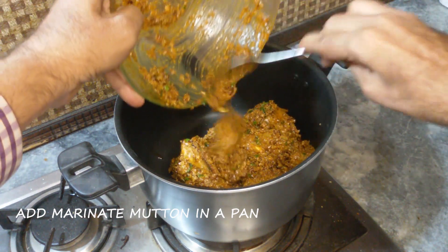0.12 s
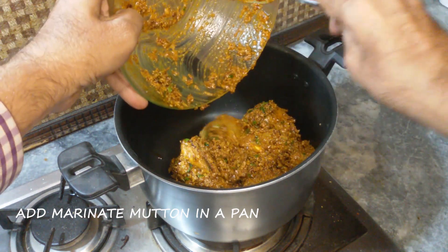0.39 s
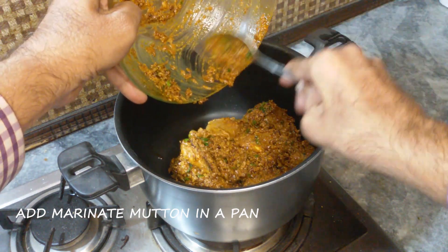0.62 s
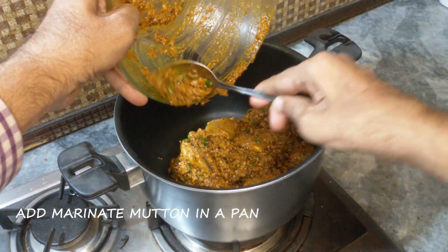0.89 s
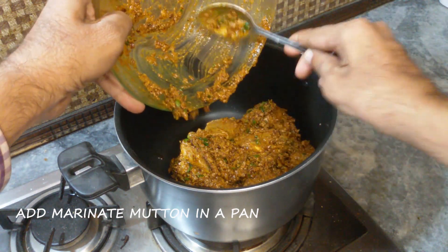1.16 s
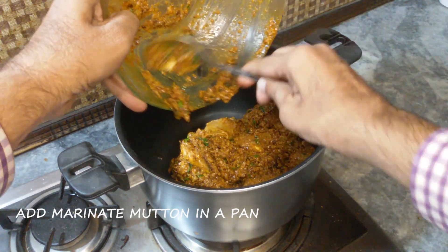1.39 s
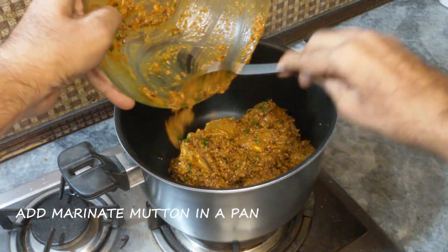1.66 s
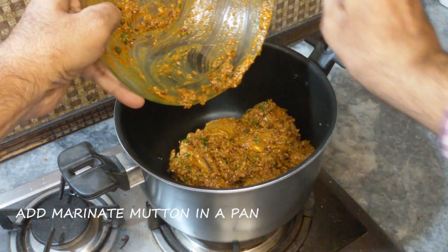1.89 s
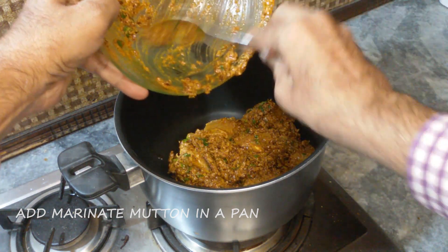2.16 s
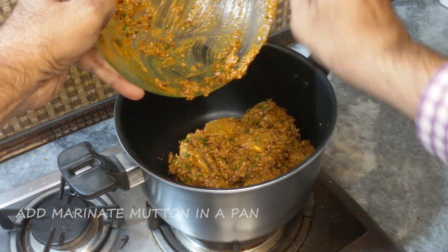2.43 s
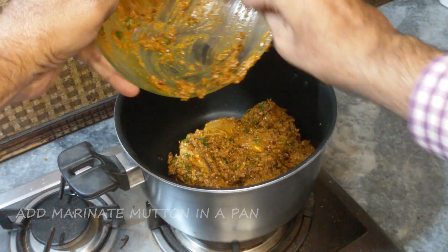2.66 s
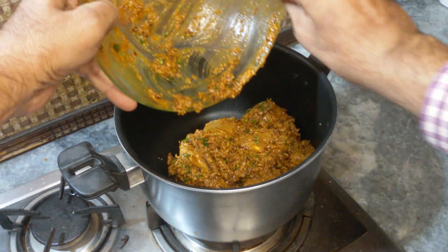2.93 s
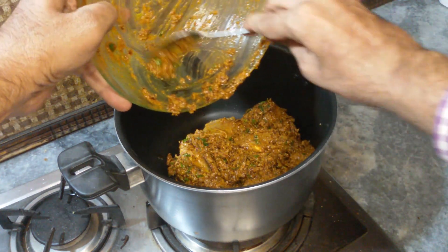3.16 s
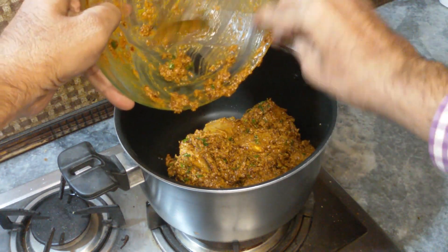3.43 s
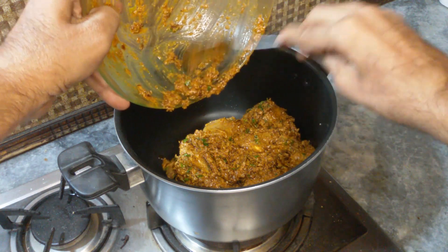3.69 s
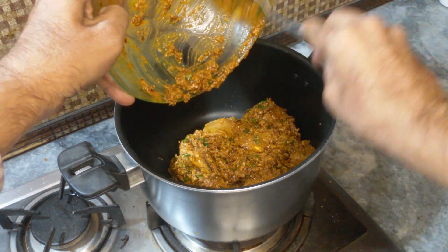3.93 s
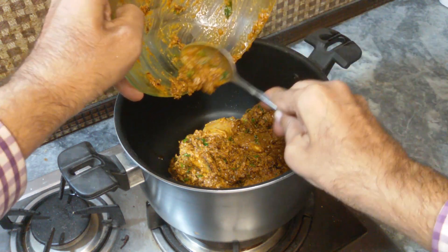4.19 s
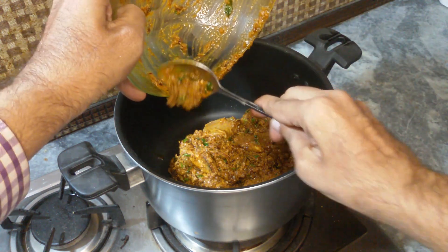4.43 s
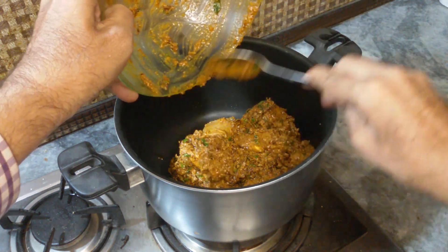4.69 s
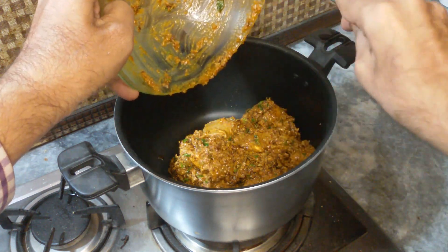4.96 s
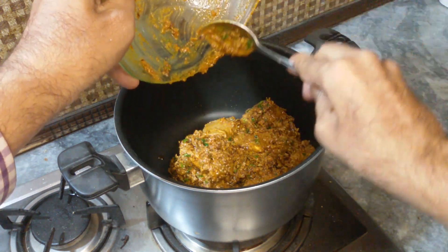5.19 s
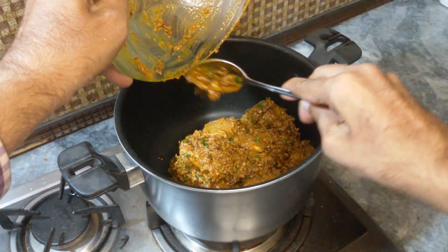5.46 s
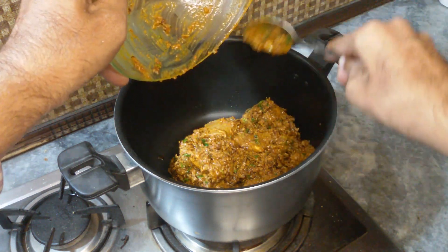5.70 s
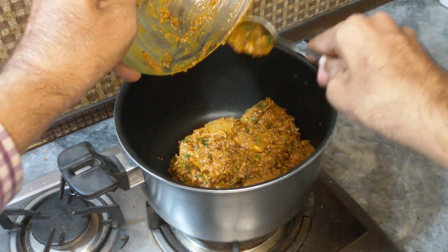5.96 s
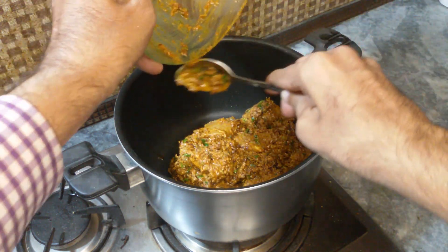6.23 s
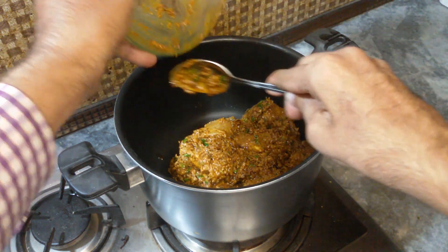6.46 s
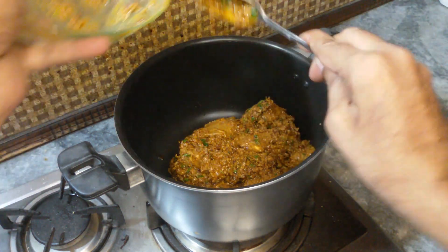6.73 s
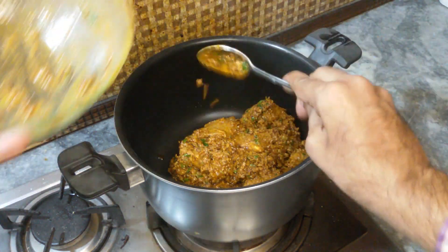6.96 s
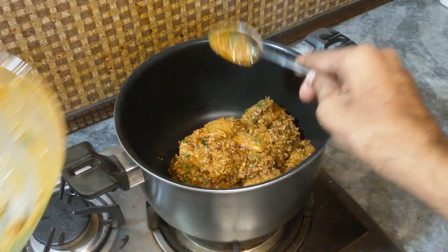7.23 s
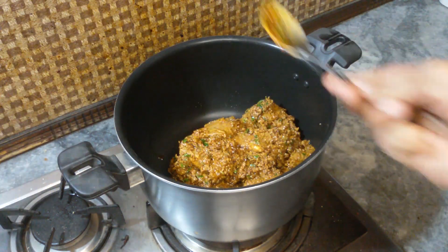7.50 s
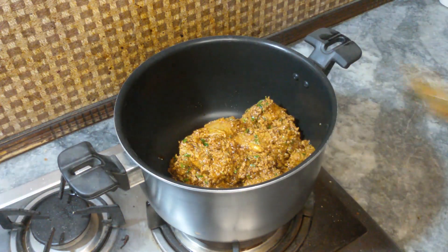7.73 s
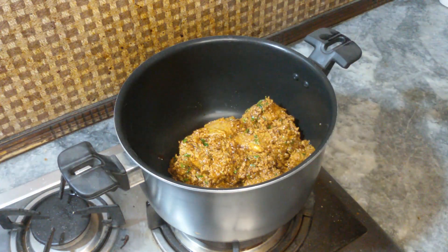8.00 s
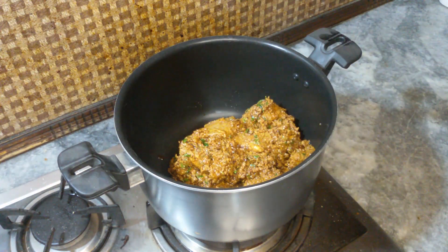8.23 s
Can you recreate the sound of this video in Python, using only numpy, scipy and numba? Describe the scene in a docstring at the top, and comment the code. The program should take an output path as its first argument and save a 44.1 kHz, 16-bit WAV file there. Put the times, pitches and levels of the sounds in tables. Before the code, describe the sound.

Wet marinated meat is spooned from a bowl into a pot with sticky drips, plops and ticks, over a low kitchen appliance hum.

```python
"""A small hard-walled kitchen: water drips and trickles into a shallow pool, a little to the right of a phone.
Drops are short bursts of filtered noise and clicks: a crack on the surface, then hissing spray.
Trapped bubbles are fading sine tones, and the trickle is thousands of tiny ones.
An appliance hums with sines and narrow noise bands; the room's air rumbles as shaped noise,
and stirs around the microphones as very low noise that swells in gusts."""
import sys
import numpy as np
from scipy import signal
from scipy.fft import rfft, irfft
from scipy.io import wavfile
from numba import njit

SR = 44100
rng = np.random.default_rng(int(sys.argv[2]) if len(sys.argv) > 2 else 0)


def magnitude_from_level(level_db):
    """Linear magnitude for a level in decibels (20 dB per decade)."""
    exponent = np.asarray(level_db, float) / 20
    return 10 ** exponent


def master_out(mix):
    """Clip the mix to full scale and print it as 16-bit PCM to the path in sys.argv[1]."""
    frames = np.transpose(np.atleast_2d(mix))
    ceiling = np.clip(frames, -1, 1)
    pcm = np.round(ceiling * 32767).astype(np.int16)
    wavfile.write(sys.argv[1], SR, pcm)


N = 369102  # length in samples


def level(x, db):
    """Scale a sound so that its rms (average strength) has the given dB level."""
    return x * magnitude_from_level(db) / np.sqrt(np.mean(x ** 2))


def along(table, hz):
    """Read a (frequency, value) table between its rows, on a log frequency axis."""
    f, v = np.transpose(table)
    return np.interp(np.log(np.maximum(hz, 1)), np.log(f), v)


def noise(gain, size=N):
    """Random noise, made stronger or weaker at each frequency by gain."""
    return irfft(rfft(rng.standard_normal(size)) * gain(np.fft.rfftfreq(size, 1 / SR)), size)


def add(out, s, sound):
    """Mix a sound in at time s."""
    i = max(int(s * SR), 0)
    out[i:i + len(sound)] += sound[:max(N - i, 0)]


@njit
def ring(n, start, hz, t60, glide, size, rise):
    """Fading sines: each swells within about `rise` cycles and slides by `glide` octaves per 20 ms."""
    out = np.zeros(n)
    for k in range(len(start)):
        phase, i0 = 0., int(start[k] * SR)
        for i in range(min(int(t60[k] * SR), n - i0)):
            t = i / SR
            phase += 2 * np.pi * hz[k] * 2 ** (glide[k] * t * 50) / SR
            swell = 1 - np.exp(-t * hz[k] / rise)
            fade = 10 ** (-3 * t / t60[k])
            out[i0 + i] += size[k] * swell * fade * np.sin(phase)
    return out


# how alike background noise is at the two microphones: (frequency [Hz], left-right correlation [0-1])
LIKENESS = [(60, 0.32), (130, 0.96), (300, 0.71), (640, 0.62), (1500, 0.93), (5000, 0.24), (15000, 0.44)]
# which side the background leans to: (frequency [Hz], left minus right [dB])
LEAN = [(60, 2.5), (110, 2), (300, .5), (800, -1), (1500, -3), (15000, -2)]


def pair(colour):
    """Stereo noise: shared and opposite parts are mixed to set how alike the two sides are."""
    f = np.fft.rfftfreq(N, 1 / SR)
    like = np.clip(along(LIKENESS, f), 0, 1)
    mid, side = rfft(rng.standard_normal((2, N)))
    both = mid * np.sqrt(1 + like) + np.array([[1], [-1]]) * side * np.sqrt(1 - like)
    lean = magnitude_from_level(np.outer([.5, -.5], along(LEAN, f)))
    return irfft(both * colour(f) * lean, N)


# tone colour of the room's air: (frequency [Hz], relative level per Hz [dB])
ROOM_TONE = [(29, -26), (50, 3), (110, -2.5), (162, -9), (318, -12.5), (553, -20.5), (654, -18),
             (812, -26.5), (1220, -25.5), (3870, -32), (5420, -37.5), (10900, -31), (15600, -38.5)]
ROOM_TONE_DB = -45.5
# unsteady hum of the appliance: (centre frequency [Hz], width [Hz], level [dB])
HUM_BANDS = [(183, 15, -61.5), (239.3, 9.6, -63)]
# steady airy band, a single row: (centre frequency [Hz], width [Hz], level [dB])
AIRY_BAND = (5360, 1370, -63)


def room_tone():
    """Broad noise gives rumble and hiss; narrower noise bands give the unsteady hum and an airy band."""
    broad = pair(lambda f: magnitude_from_level(along(ROOM_TONE, f)) * (f > 45) * (f < 15500))
    bands = 0
    for hz, width, db in HUM_BANDS + [AIRY_BAND]:
        band = pair(lambda f: 1 / (1 + (2 * (f - hz) / width) ** 2))
        bands = bands + level(band, db)
    return level(broad, ROOM_TONE_DB) + bands


# steadiest tones of the appliance: (frequency [Hz], rms pitch wander [Hz], level [dB])
MOTOR_TONES = [(101.3, .6, -51.5), (120, .7, -54)]


def motor(slow_hz=2.23, waver_db=1.0):
    """The appliance's steadiest tones: sines whose pitch and level wander slowly."""
    def slow(f):
        return 1 / (1 + (f / slow_hz) ** 2)

    out = 0
    for hz, wander_hz, db in MOTOR_TONES:
        wander = level(noise(slow), 0)
        waver = level(noise(slow), 0)
        phase = 2 * np.pi * np.cumsum(hz + wander_hz * wander) / SR
        tone = magnitude_from_level(waver_db * waver) * np.sin(phase)
        lean = magnitude_from_level(np.array([[.5], [-.5]]) * along(LEAN, hz))
        out = out + level(tone, db) * lean
    return out


# gusts of air at the microphones; fades under 0.05 s, negative ones too, count as 0.05 s:
# (time of the peak [s], peak level [dB], time to fade by 20 dB [s])
GUSTS = [(0.0, -31.5, 0.23), (0.3, -34, 0.7), (0.8, -22, -0.87), (1.12, -31, 1.67), (1.6, -38, 3.8),
         (2.15, -38, 1.6), (4.08, -33, 0.73), (4.6, -38, 0.3), (5.11, -37.5, 2.4), (5.43, -29.5, -0.36),
         (6.2, -33.5, 1.5), (6.4, -22.5, -0.56), (6.641, -28.5, -0.26), (6.88, -32, 0.45),
         (7.22, -32.5, 0.1), (8.2, -41.5, 1.5)]
GUST_RISE_SHARE, CALM_DB = 0.38, -48.5  # rise time as a share of the fade; level between gusts


def draught():
    """Moving air buffets the microphones: very low noise in gusts, partly different at each one."""
    t = np.arange(N) / SR
    power = magnitude_from_level(2 * CALM_DB)
    for s, db, fade_s in GUSTS:
        away = np.where(t < s, (s - t) / GUST_RISE_SHARE, t - s) / max(fade_s, .05)
        power = power + magnitude_from_level(2 * (db - 20 * away))
    low = pair(lambda f: f ** 2 / (f ** 2 + 14 ** 2) / (1 + (f / 30) ** 3))
    return level(low, 0) * np.sqrt(power)


def swarm(count, low_hz, top_hz, cycles, spread_db, db, follow, after_s):
    """Many tiny ringing grains, most faint and a few loud; a share trails the clear drops and bubbles."""
    when, pick, delay, pitch, length, slide, luck = rng.random((count, 7)).T
    leaders = np.array([row[0] for row in DROPS + BUBBLES])
    trailing = leaders[(when * len(leaders)).astype(int)] - after_s * np.log(1 - delay)
    start = np.where(pick < follow, trailing, when * N / SR)
    hz = low_hz * (top_hz / low_hz) ** pitch
    t60 = cycles * 3 ** (2 * length - 1) / hz
    size = magnitude_from_level(np.minimum(-spread_db * np.log(1 - luck), 3 * spread_db))
    # octaves per 20 ms: mostly upward, as a bubble nears the surface
    glide = 0.91 * (slide ** 3 - .1)
    return level(ring(N, start, hz, t60, glide, size, 1.0), db)


def patter():
    """Small grains between the clear drops, from low to high: gurgle, fizz and crackle."""
    gurgle = swarm(count=1000, low_hz=860, top_hz=2587, cycles=43, spread_db=3.2, db=-60.0,
                   follow=.55, after_s=.05)
    fizz = swarm(count=1500, low_hz=2200, top_hz=5356, cycles=26, spread_db=3.4, db=-60.5,
                 follow=0.6, after_s=.035)
    crackle = swarm(count=4000, low_hz=5000, top_hz=14800, cycles=35, spread_db=4.5, db=-66.0,
                    follow=0.45, after_s=.04)
    return gurgle + fizz + crackle


def trickle(width=0.1):
    """The patter comes from all over the pool, so part of it differs at the two microphones."""
    return patter() + width * np.array([[1], [-1]]) * patter()


def drops(rows, spray_t60_s, spray_hz, wider, crack_s=.0012):
    """A sharp band-limited crack, then spray falling back as a gritty hiss in a wider band."""
    out = np.zeros(N)
    t = np.arange(4096) / SR
    f = np.maximum(np.fft.rfftfreq(len(t), 1 / SR), 1)
    for s, db, hz, octaves, spray_db in rows:
        octaves = max(octaves, .1)
        crack_band = np.exp(-.5 * (np.log2(f / hz) / octaves) ** 2)
        crack = irfft(crack_band * np.exp(-2j * np.pi * f * crack_s))
        # the spray's centre lies midway, in octaves, between the crack and spray_hz
        spray_centre = np.sqrt(hz * spray_hz)
        spray_band = np.exp(-.5 * (np.log2(f / spray_centre) / (wider * octaves)) ** 2)
        grit = magnitude_from_level(12.5 * rng.standard_normal(len(t))) * rng.standard_normal(len(t))
        spray = level(irfft(rfft(grit) * spray_band), spray_db)
        spray = spray * 1000 ** (-t / spray_t60_s) * (t > crack_s)
        add(out, s - crack_s / 2, magnitude_from_level(db) * (crack / np.abs(crack).max() + spray))
    return out


def spits(count=300, low_hz=1800, top_hz=15000, db=-48, spread_db=9, octaves=0.53, spray_db=-6):
    """Fainter drops at random moments, with plenty of spray, each of its own colour."""
    when, pitch, size, width = rng.random((count, 4)).T
    hz = low_hz * (top_hz / low_hz) ** pitch
    peak_db = db + spread_db * (size - .5)
    rows = zip(when * N / SR, peak_db, hz, octaves * width, np.full(count, spray_db))
    return drops(rows, spray_t60_s=0.15, spray_hz=8000, wider=1.7)


# drops that crack on the surface, levels before the room is added:
# (time [s], crack peak level [dB], centre frequency [Hz], first spray level relative to the crack [dB])
DROPS = [(0.0269, -35, 5160, -5), (0.1249, -26.5, 5100, -21), (0.2324, -36, 10600, -11),
         (0.4206, -28.5, 6720, -28), (0.778, -35, 5040, -12), (0.9005, -31.5, 3700, -12.5),
         (1.2004, -24.5, 5900, -16.5), (1.312, -32.5, 3800, -22), (1.4385, -33.5, 8060, -29),
         (1.517, -31.5, 9830, -31), (1.6717, -25, 5000, -12), (2.1237, -7.5, 12800, -33),
         (2.2263, -31, 6030, -31), (2.3113, -30.5, 12300, -12), (2.7576, -34, 5810, -20),
         (3.012, -32, 10700, -11), (3.135, -32.5, 6040, -17), (3.2051, -31, 4800, -18),
         (3.3055, -29, 8000, -34), (3.7466, -31.5, 9700, -12), (3.8839, -22, 6170, -19),
         (4.0302, -30.5, 4270, -16), (4.2045, -33, 3900, -25), (4.348, -20.5, 7600, -26),
         (4.4347, -30, 3360, -24), (4.4345, -29.5, 9000, -17), (4.8407, -31.5, 8000, -31),
         (5.0448, -28, 7900, -18), (5.068, -33, 11000, -29), (5.29, -32, 8700, -25),
         (5.3449, -27, 6900, -19), (5.6395, -29.5, 8100, -11.5), (5.7426, -27, 12200, -28),
         (6.134, -29, 11300, -27), (6.3684, -26, 3730, -19.5), (6.5782, -24.5, 5450, -38),
         (6.6666, -23, 5170, -26), (6.8344, -31, 10500, -19), (6.99, -27, 9500, -28),
         (7.063, -34, 9050, -27), (7.3063, -29.5, 11000, -18), (7.453, -27, 10200, -32),
         (7.507, -33, 11900, -33), (7.525, -31.5, 8490, -15), (7.6007, -27, 13200, -36),
         (7.7195, -29.5, 11800, -15.5), (7.8219, -26, 8270, -17), (8.2533, -38, 6530, -10),
         (8.319, -24, 12000, -27)]
CRACK_OCTAVES = 0.31  # width of a clear drop's crack


def clear_drops():
    """The drops that stand out, each cracking on the surface and throwing spray."""
    rows = [(s, db, hz, CRACK_OCTAVES, spray_db) for s, db, hz, spray_db in DROPS]
    return drops(rows, spray_t60_s=0.16, spray_hz=8200, wider=4.3)


USUAL_DB = -35  # a bubble's usual level
# small, high bubbles die sooner: t60 = BUBBLE_T60_S * (1000 / pitch in Hz) ** damping power
# the power grows with each dB above the usual level: loud high bubbles are mere pops
BUBBLE_T60_S, DAMPING_POWER, POWER_PER_DB = 0.057, 1.26, 0.12
# bend of the pitch in 20 ms: mean, extra sag per dB above the usual level, scatter
SAG_OCTAVES, SAG_PER_DB, BEND_SCATTER = -.02, -.004, .035
BUBBLE_RISE_CYCLES = .6
# bubbles that stand out, before the room is added: (time [s], level [dB], pitch [Hz])
BUBBLES = [(0.143, -38, 1087), (0.177, -35, 2050), (0.312, -41.5, 1260), (0.436, -38, 2180),
           (0.538, -33.5, 1560), (0.601, -38, 1810), (0.611, -36.5, 1200), (0.743, -40, 2550),
           (0.886, -40, 780), (0.974, -33.5, 1045), (0.989, -41, 2650), (1.128, -39.5, 2360),
           (1.259, -38, 1696), (1.24, -45, 1320), (1.315, -40.5, 1120), (1.332, -38, 1490),
           (1.349, -42, 2200), (1.438, -44, 1696), (1.476, -35.5, 1007), (1.481, -32, 1200),
           (1.505, -40.5, 726), (1.647, -45, 1550), (1.683, -35.5, 1022), (1.807, -46, 1440),
           (1.87, -40, 1500), (1.926, -38.5, 1233), (1.975, -41.5, 1060), (2.007, -37, 3250),
           (2.125, -38.5, 964), (2.143, -41, 1060), (2.167, -27, 2700), (2.191, -33, 1787),
           (2.192, -34, 3220), (2.197, -43, 753), (2.359, -38, 1830), (2.426, -42.5, 1454),
           (2.443, -33, 2010), (2.512, -38, 1800), (2.634, -36, 2680), (2.654, -42, 1520),
           (2.692, -39.5, 1260), (2.707, -24.5, 922), (2.799, -40, 1216), (2.833, -38, 2420),
           (3.036, -35, 1915), (3.164, -33, 1704), (3.338, -38.5, 1360), (3.375, -34.5, 1460),
           (3.429, -39, 2680), (3.648, -40.5, 987), (3.651, -41, 1760), (3.671, -28, 2600),
           (3.732, -34, 1570), (3.758, -37, 1900), (3.826, -38, 2910), (3.857, -34, 1950),
           (3.909, -40, 2850), (3.999, -37, 1810), (4.034, -42, 1670), (4.054, -39.5, 920),
           (4.115, -30, 1610), (4.19, -40, 1510), (4.225, -38, 3630), (4.366, -45, 1400),
           (4.398, -38, 2100), (4.497, -40.5, 1420), (4.522, -28.5, 918), (4.583, -42, 940),
           (4.628, -39, 1260), (4.644, -35, 1560), (4.715, -37.5, 1390), (4.771, -34, 1122),
           (4.862, -42, 720), (4.881, -46, 1820), (5.004, -39.5, 1874), (5.17, -39, 3100),
           (5.18, -46, 1660), (5.229, -37.5, 2810), (5.243, -37, 1410), (5.343, -40.5, 994),
           (5.545, -40.5, 920), (5.592, -40, 3200), (5.794, -36.5, 1140), (5.795, -34, 2090),
           (5.942, -40, 935), (5.99, -39.5, 1740), (6.015, -37, 1200), (6.083, -39, 1103),
           (6.16, -40, 1320), (6.266, -42, 1020), (6.364, -35, 1046), (6.373, -38, 1870),
           (6.527, -34, 2860), (6.695, -43, 1530), (6.731, -28.5, 1126), (6.836, -39, 1780),
           (6.858, -36, 807), (6.896, -36, 1610), (6.954, -40, 1285), (6.972, -31.5, 1050),
           (6.992, -22, 2910), (7.02, -42.5, 995), (7.08, -18, 2630), (7.082, -37.5, 1510),
           (7.136, -43, 1160), (7.234, -43, 2900), (7.25, -37, 3580), (7.348, -38, 2970),
           (7.543, -39, 1330), (7.57, -44, 1140), (7.714, -39.5, 1350), (7.797, -41, 1600),
           (7.876, -38, 1193), (7.947, -41, 1120), (8.14, -31.5, 1950), (8.29, -41, 1280),
           (8.345, -38, 2440)]


def bubbles(twin_glide=0.112, twin_db=-8, detune=0.09, later_s=0.017):
    """A trapped bubble rings at its own pitch and bends a little; a fainter ring of like pitch follows."""
    s, db, hz = np.transpose(BUBBLES)
    louder = db - USUAL_DB
    t60 = BUBBLE_T60_S * (1000 / hz) ** (DAMPING_POWER + POWER_PER_DB * louder)
    t60 = np.clip(t60, .004, .11)
    bend, twin_bend, apart, wait = rng.standard_normal((len(s), 4)).T
    glide = SAG_OCTAVES + SAG_PER_DB * louder + BEND_SCATTER * bend
    first = ring(N, s, hz, t60, glide, magnitude_from_level(db), BUBBLE_RISE_CYCLES)
    twin_s = s + later_s * np.abs(wait)
    twin_hz = hz * 2 ** (detune * apart)
    twin_size = magnitude_from_level(np.minimum(db, USUAL_DB) + twin_db)
    twin = ring(N, twin_s, twin_hz, t60, twin_glide * twin_bend, twin_size, 2 * BUBBLE_RISE_CYCLES)
    return first + twin


# bubbles that rise and burst, before the room is added:
# (time [s], starting level [dB], first pitch [Hz], life [s], climb [octaves])
RISERS = [(7.587, -53, 1240, 0.029, 0.89), (7.742, -41, 2200, 0.011, 1), (7.842, -44, 1425, 0.026, 1.06),
          (8.103, -45, 633, 0.042, 1)]


def risers(hurry=3.08, fade_db=-7):
    """The pitch climbs ever faster as the water above the bubble thins, until it bursts."""
    out = np.zeros(N)
    for s, db, hz, life, octaves in RISERS:
        age = np.arange(int(life * SR)) / (life * SR)  # 0 at the start, 1 at the end
        phase = 2 * np.pi * np.cumsum(hz * 2 ** (octaves * age ** hurry)) / SR
        soft_ends = signal.windows.tukey(len(age), .25)
        add(out, s, magnitude_from_level(db + fade_db * age) * soft_ends * np.sin(phase))
    return out


ROOM_DB = -6  # the whole tail against the direct sound
# early echo off basin and walls: (delay [s], level [dB])
ECHOES = [(.0052, -25)]
# time the room's tail takes to fade by 60 dB: (frequency [Hz], time [s])
ROOM_T60_S = [(500, 0.19), (2000, 0.13), (6000, 0.056), (15000, 0.06)]


def room(x):
    """An early echo, and a blurred tail that dies sooner in the treble and differs at each microphone."""
    t = np.arange(SR // 2) / SR
    reply = np.zeros((2, len(t)))
    for hz in 250 * 2 ** np.arange(0, 6.1, .5):
        def band(f):
            return np.exp(-.5 * (np.log2(np.maximum(f, 1) / hz) / 0.35) ** 2)

        shared = noise(band, size=len(t))
        separate = np.array([noise(band, size=len(t)) for _ in range(2)])
        reply += (shared + separate) * 1000 ** (-t / along(ROOM_T60_S, hz))
    reply *= 1 - np.exp(-t / 0.00037)  # the tail takes a moment to build up
    reply *= magnitude_from_level(ROOM_DB) / np.sqrt(np.sum(reply ** 2) / 2)
    reply[:, 0] += 1  # the direct sound
    for s, db in ECHOES:
        reply[:, int(s * SR)] += magnitude_from_level(db)
    return signal.fftconvolve(x, reply, axes=1)[:, :N]


def scene(water_lean_db=-2.5):
    """Water in the room, leaning right (left minus right in dB), over the room's own noise."""
    # each kind of sound rises from its own part of the pool, so the room answers each differently
    parts = (bubbles() + risers(), clear_drops(), spits(), trickle())
    water = sum(room(np.atleast_2d(part)) for part in parts)
    lean = magnitude_from_level([[water_lean_db / 2], [-water_lean_db / 2]])
    return water * lean + room_tone() + motor() + draught()


def roll_off(x):
    """The treble ends steeply here."""
    return signal.sosfilt(signal.butter(12, 16990, fs=SR, output="sos"), x)


def record(dry):
    """The phone cuts the top with a steep low-pass filter at 16 kHz."""
    low_pass = signal.ellip(8, .2, 60, 16000, fs=SR, output="sos")
    mix = signal.sosfilt(low_pass, dry)
    return roll_off(mix)


dry = scene()
out = record(dry)
master_out(out)
```